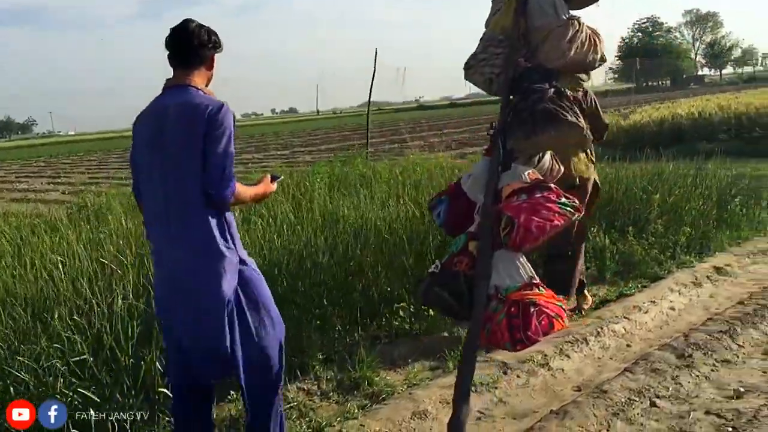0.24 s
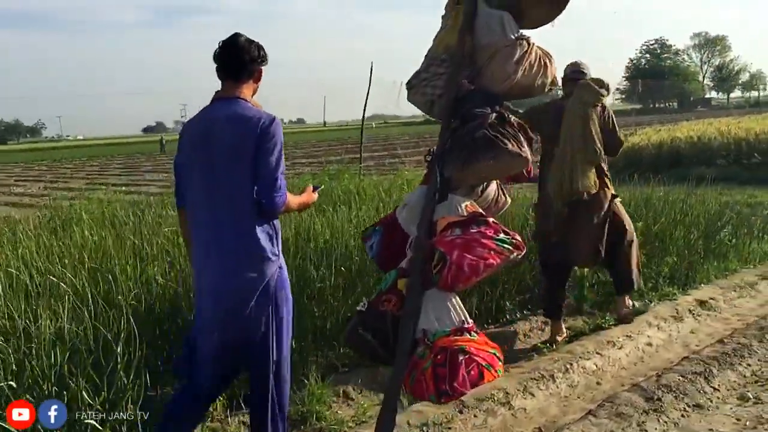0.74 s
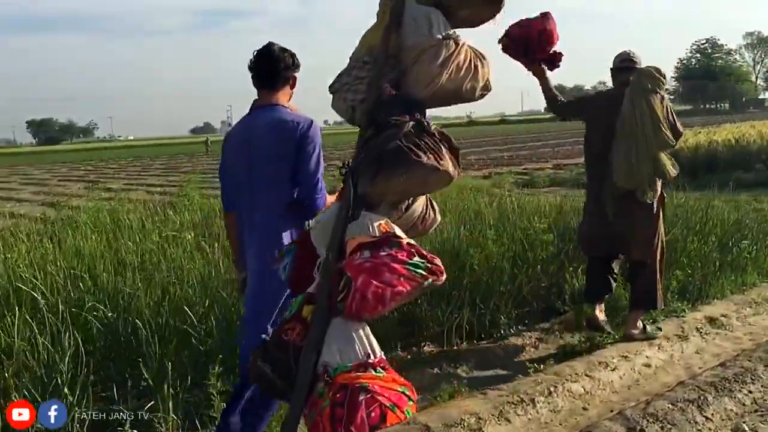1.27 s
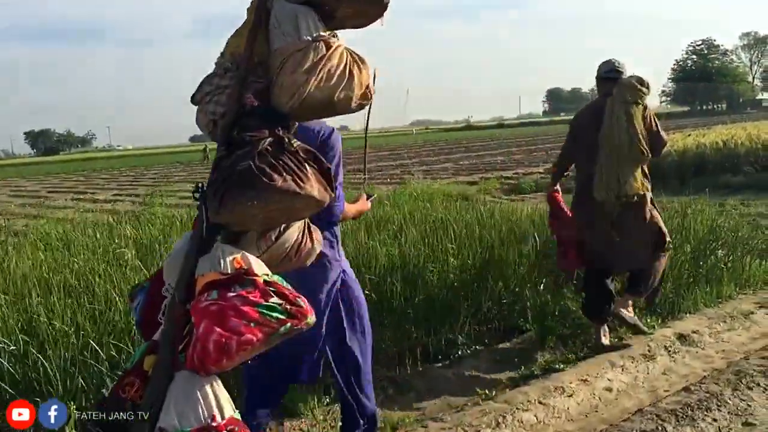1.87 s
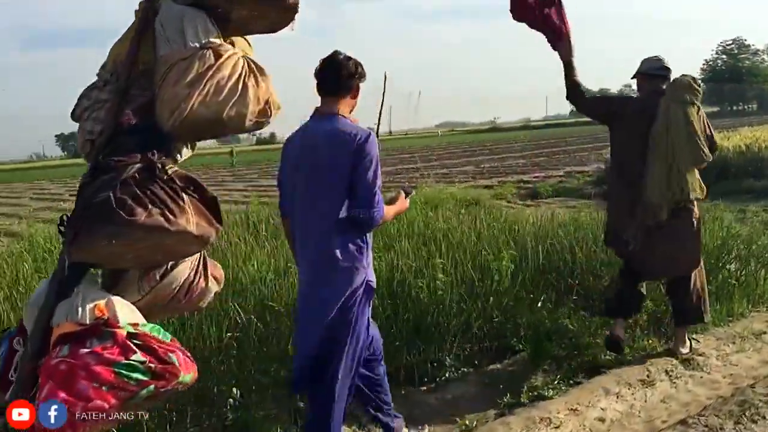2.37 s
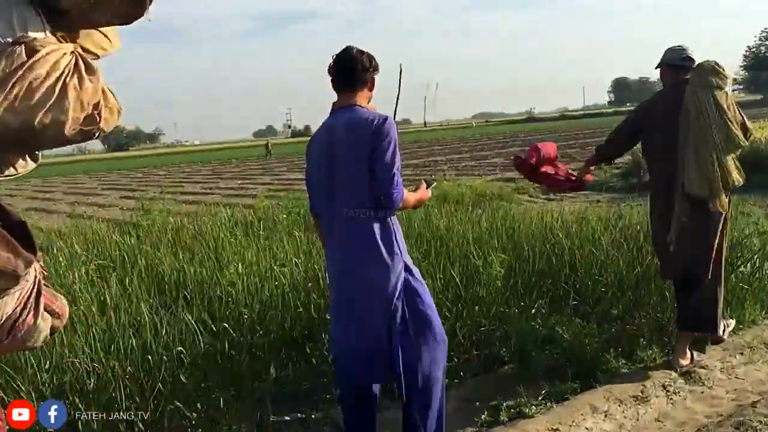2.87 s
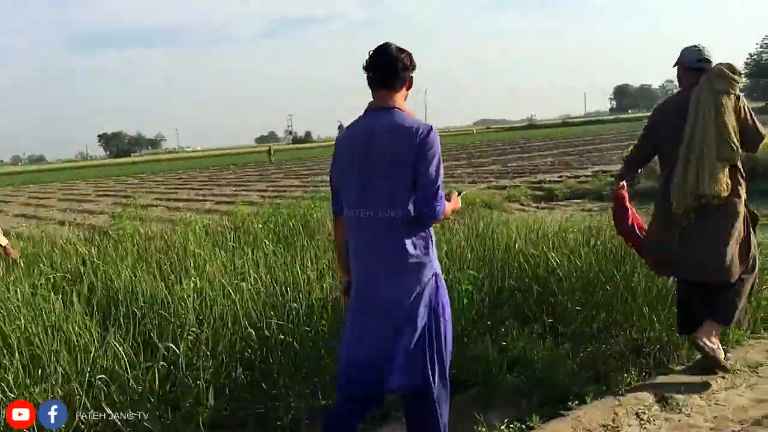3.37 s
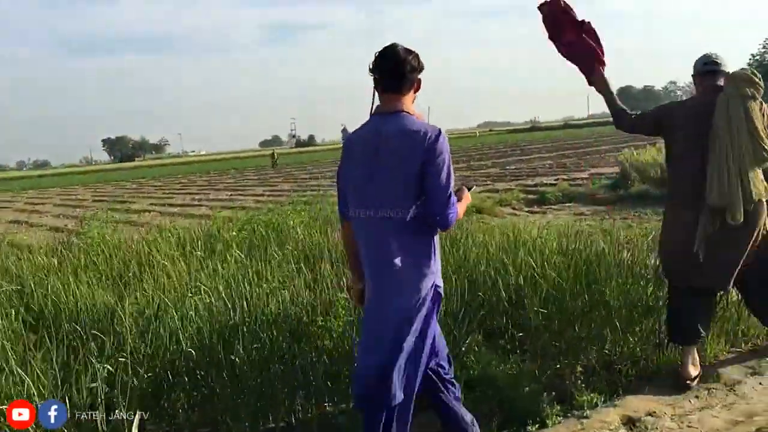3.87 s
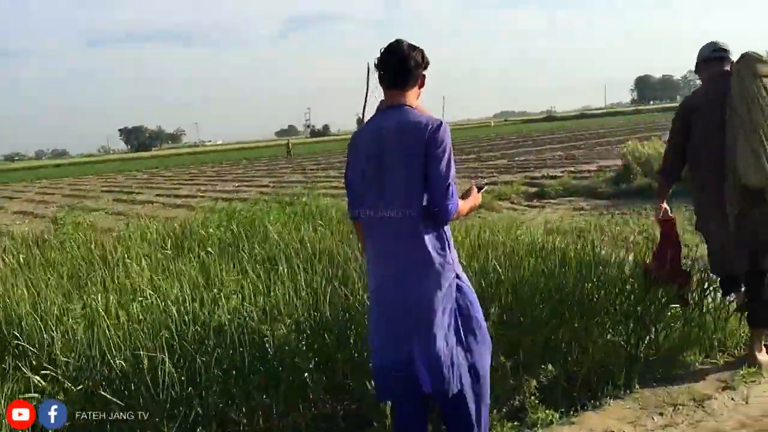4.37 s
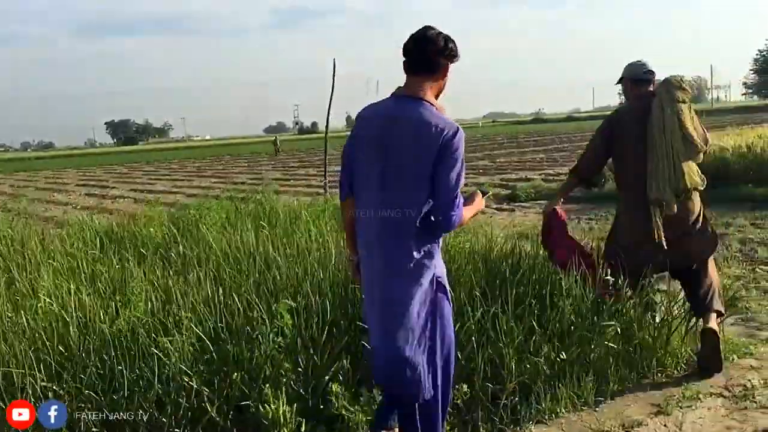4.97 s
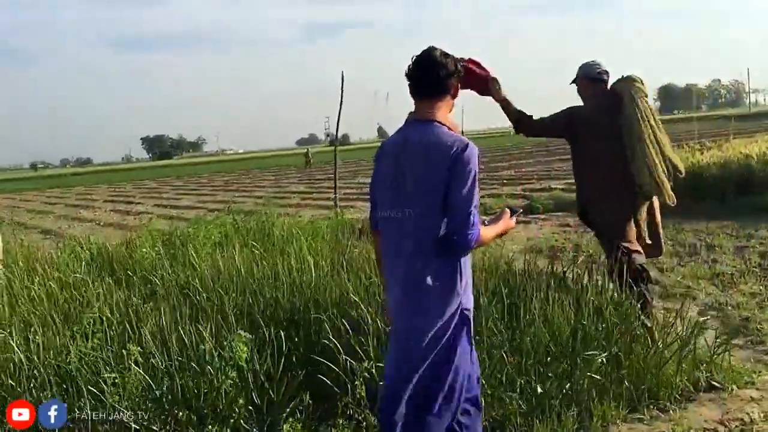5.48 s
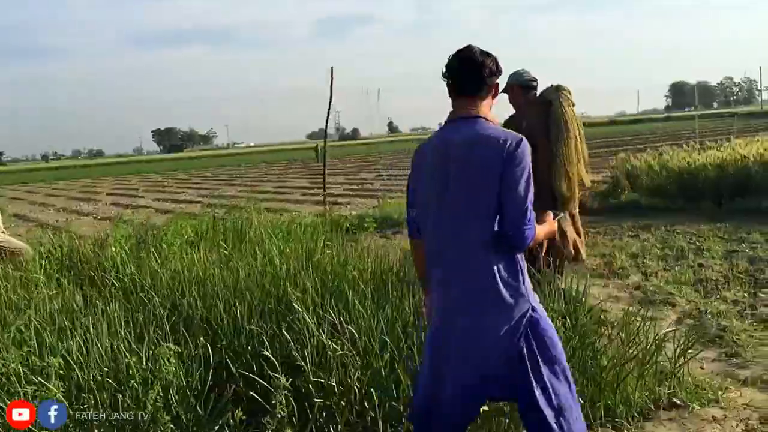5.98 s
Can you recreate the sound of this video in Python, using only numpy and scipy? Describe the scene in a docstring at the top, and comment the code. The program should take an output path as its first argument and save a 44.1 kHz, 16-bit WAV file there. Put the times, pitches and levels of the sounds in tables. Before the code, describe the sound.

A sparse opening of quail whips, stray pips and walking noise in an open field gives way to regular, bright bird-call phrases: a fast rising trill, then a closing triplet. Quail keep answering with upward flicks and quiet hoarse growls, while far caws and thin whistles grow busier. Stalks crackle, feet scuff and low wind buffets ring the handheld microphone.

```python
"""Open crop field in the morning. A hand-worked bird call pips in trills and triplets of short sagging whistles.
Caged quail answer with rising whip notes (swept sines) and throbbing growls (harmonics with breath noise).
Farther birds whistle in gliding sines and caw in pulsed partials. People walk through the crop in grainy
noise, with knocks and crackling stalks; wind rumbles and rings the microphone port over a far hush."""
import sys
import numpy as np
from scipy import signal
from scipy.io import wavfile

SR = 44100
rng = np.random.default_rng(int(sys.argv[2]) if len(sys.argv) > 2 else 0)


def generate_wav(signal):
    """Clip the signal to [-1, 1] and save it as 16-bit WAV at the path in sys.argv[1]."""
    frames = np.transpose(np.atleast_2d(signal))
    scaled = np.clip(frames, -1, 1) * 32767
    pcm = np.round(scaled).astype(np.int16)
    wavfile.write(sys.argv[1], SR, pcm)


N = 274743

# Other pips, single or beside the trills and triplets; the first is the tail of a whip.
# Each row: time in seconds, level in dB, pitch in Hz.
OTHER_PIPS = [(0.004, -51, 2154), (0.236, -43, 2180), (.246, -58, 2160), (1.4437, -56.5, 2510),
              (2.1527, -36.5, 2540), (2.251, -39.5, 2377), (2.2952, -50.5, 2470), (2.8394, -47, 2430),
              (2.9174, -42.5, 2490), (3.8586, -45, 2450), (4.8488, -41, 2410), (5.1383, -47.5, 2410),
              (5.5425, -47, 2440), (5.724, -42, 2454), (5.734, -39.5, 2435), (5.8667, -38.5, 2506),
              (5.879, -42.5, 2570)]
# Rising trills that open each phrase. Each row: first pip in seconds, last pip in seconds, first level in dB,
# last level in dB, swell in the middle in dB, first pitch in Hz, last pitch in Hz.
TRILLS = [(2.7353, 2.778, -40.5, -45, 9, 2423, 2466), (3.305, 3.35, -41, -33, 5, 2330, 2450),
          (4.015, 4.063, -30, -32, 0, 2365, 2510), (4.621, 4.685, -37.5, -30.5, 2, 2220, 2437),
          (5.253, 5.315, -31.5, -33.5, 0, 2175, 2420), (5.899, 5.959, -34, -32.5, -4.5, 2170, 2330)]
# Triplets that close each phrase. Each row: first pip in seconds, its level in dB, its pitch in Hz,
# middle pip against the first in dB.
TRIPLETS = [(2.8552, -36, 2455, -9), (3.448, -31, 2440, -32), (4.14, -28, 2370, -3),
            (4.785, -30, 2350, -6.5), (5.4174, -27.5, 2352, -10), (6.064, -33.5, 2348, -8)]
# Quail whip notes. Each row: time near the top of the sweep in seconds, top level in dB,
# slow start against the top in dB, start pitch in Hz.
WHIPS = [(0.194, -38, 3, 1638), (0.318, -41, 9.5, 1627), (1.9342, -38, -11.5, 1490),
         (2.1113, -36.5, -5.5, 1406), (2.233, -38.5, -5, 1350), (2.9916, -34.5, -12, 1534),
         (3.292, -38.5, -5.5, 1350), (3.9998, -38, -3.5, 1456), (4.185, -49.5, 5.5, 1505),
         (4.304, -45, 1, 1426), (4.772, -37, -18, 1510), (4.88, -36.5, -19.5, 1400),
         (5.0524, -31, -12.5, 1530), (5.2332, -43.5, 2.5, 1357), (5.3595, -41.5, 0.5, 1440),
         (5.64, -42, -14, 1466), (5.75, -36.5, -21, 1410)]
# Quail growls. Each row: start in seconds, length in seconds, pitch in Hz, level in dB,
# moment one throb opens in seconds, lift of the upper partials in dB.
GROWLS = [(0.692, 0.3, 617.4, -56.5, 0.8665, -5), (2.281, 0.37, 611, -58.5, 2.402, -4),
          (3.79, 0.31, 638.6, -55, 3.928, -7), (5.331, 0.22, 631.5, -53, 5.375, 6.5)]
# Colour of the growling throat. Each row: frequency in Hz, relative level in dB.
GROWL_THROAT = [(290, -50), (500, -10), (1020, -18), (1250, 1.5), (1900, 0.5), (2480, 9.5), (3100, 5.5),
                (4800, -8), (7420, -3.5), (9000, -80), ]
# Far whistles. Each row: start in seconds, length in seconds, first, middle and last pitch in Hz, level in dB.
WHISTLES = [(1.305, .035, 2400, 2480, 2580, -56), (2.05, .032, 2500, 2400, 2550, -53),
            (2.19, .05, 4150, 4100, 3950, -66), (3.153, .03, 1450, 1620, 1700, -46),
            (3.243, .035, 1600, 1560, 1500, -58), (3.505, .05, 3000, 3100, 3500, -52),
            (4.582, .068, 3350, 3050, 3350, -53), (4.815, .055, 2950, 3100, 3550, -49),
            (5.62, .022, 1500, 1650, 1750, -46), (5.868, .07, 3350, 3050, 3450, -52),
            (6.092, .055, 3000, 3100, 3400, -50)]
# Far hoarse caws. Each row: start in seconds, length in seconds, throat pitch in Hz, level in dB.
CAWS = [(0.797, 0.31, 1415, -61), (1.384, 0.19, 1370, -60.5), (3.941, 0.24, 1456, -57),
        (4.258, 0.12, 1490, -60), (4.429, 0.21, 1375, -57.5), (4.524, 0.15, 1703, -57),
        (4.743, 0.18, 1463, -65), (5.109, 0.16, 1650, -58.5), (5.239, 0.28, 1340, -53.5),
        (5.369, 0.204, 1700, -58.5), (5.597, 0.21, 1690, -55), (5.704, 0.13, 1403, -66.5),
        (5.825, 0.12, 1690, -67), (6.184, 0.084, 1371, -52)]
# Feet scuffing the soil. Each row: start in seconds, length in seconds, level in dB.
SCUFFS = [(.2, 0.4, -55.5), (.72, 0.26, -58.5), (1.19, 0.14, -59), (1.45, 0.16, -61), (1.75, 0.3, -58.5),
          (2.28, 0.34, -59.5), (2.58, 0.19, -55), (3.1, 0.37, -61.5), (4.07, 0.098, -50), (4.55, 0.54, -64),
          (5.28, 0.22, -56), (5.54, 0.085, -54.5), (6.12, 0.36, -54)]
# Colour of the scuffs. Each row: frequency in Hz, relative level in dB per Hz.
SCUFF_COLOUR = [(150, 2), (400, -3), (900, -0.5), (1300, -17), (3000, -25)]
# Legs swishing through the leaves. Each row: start in seconds, length in seconds, level in dB.
SWISHES = [(.35, 0.33, -61), (.8, 0.36, -62), (1.36, 0.062, -67), (2.24, 0.37, -59.5), (3.19, 0.45, -59),
           (4.06, 0.28, -64), (4.54, 0.24, -57.5), (5.1, 0.59, -56.5), (6.08, 0.14, -52)]
# Colour of the leaves. Each row: frequency in Hz, relative level in dB per Hz.
LEAF_COLOUR = [(1000, 6), (2500, 8.5), (6000, 1.5), (10500, -1.5), (15000, -0.5)]
# Knocks and one thin tick. Each row: time in seconds, strike level in dB, pitch in Hz.
KNOCKS = [(1.198, -38, 497), (1.207, -40, 830), (1.2262, -29.5, 610), (1.357, -47, 587), (1.846, -35, 265),
          (2.393, -37.5, 1270), (2.793, -40.5, 1550), (2.9285, -41, 16000), (3.539, -44.5, 750),
          (4.078, -33.5, 870), (4.582, -38.5, 955), (5.553, -34.5, 960), (5.672, -39, 810)]
# Crackling stalks. Each row: time just before the peak in seconds, level in dB, decay time in seconds,
# lowest pitch in Hz.
SNAPS = [(1.751, -58.5, 0.013, 3000), (1.84, -42.5, 0.017, 1220), (1.9648, -46, 0.02, 4950),
         (2.044, -57, 0.018, 6960), (3.223, -51.5, .02, 2970), (3.272, -51.5, 0.021, 6000),
         (4.446, -61.5, 0.036, 10300), (4.571, -48, 0.036, 2970), (4.815, -46.5, 0.0049, 3970),
         (4.877, -49.5, 0.0093, 5960), (5.602, -48, 0.0085, 3030), (6.108, -45.5, 0.011, 2020),
         (6.211, -47.5, 0.012, 6000)]
# Wind slaps. Each row: time just before the slap in seconds, strike level in dB, puff against the slap in dB.
BUFFETS = [(0.28, -33, -10), (1.225, -40, 1), (1.511, -38.5, -0.5), (1.943, -33.5, -26), (2.197, -40, -7),
           (2.372, -30.5, 1.5), (2.631, -30, -1.5), (2.931, -34, 0), (3.049, -24.5, -5), (3.227, -32.5, 6),
           (3.643, -26, -2), (3.775, -25.5, -9), (3.957, -38, 8.5), (4.036, -29, -20), (4.337, -40.5, 9.5),
           (4.472, -32, 6), (4.613, -24, -3), (4.78, -31, -15), (5.055, -21, -4), (5.168, -31.5, 0.5),
           (5.333, -26.5, 1), (5.743, -34.5, 9.5), (5.87, -31, 19)]
# Turbulence between the slaps. Each row: time in seconds, level in dB.
WIND_LEVEL = [(0.0, -41.5), (0.17, -63), (0.6, -63.5), (0.9, -52), (1.25, -53.5), (1.6, -56.5), (2.44, -44),
              (2.88, -48), (3.12, -41.5), (3.5, -55), (3.9, -43), (4.34, -51.5), (4.53, -40), (4.93, -51),
              (5.26, -48.5), (5.79, -39.5), (5.95, -49.5), (6.23, -41)]
# Colour of the turbulence. Each row: frequency in Hz, relative level in dB per Hz.
WIND_COLOUR = [(15, -42), (25, -9), (48, -2), (70, 3), (146, -14.5), (400, -35.5), (520, -92)]
# Colour of the far hush. Each row: frequency in Hz, relative level in dB per Hz.
AIR_COLOUR = [(88, -59), (150, -4.5), (466, -11), (2180, -13.5), (2500, -16.5), (4860, -22), (15100, -27),
              (16000, -37)]

PIP_GAP_S = 0.021   # approximate spacing of the squeezes in a trill
MIDDLE_S, MIDDLE_DROP_HZ = 0.015, 90.5   # the middle pip of a triplet is lower
LAST_S, LAST_RISE_HZ, LAST_DB = 0.046, 54.4, -2   # the last one is a little higher and softer
CAW_PULSES_PER_S = 81   # before the arch and waver of each caw
GROUND_ECHO_S, GROUND_ECHO_DB = 0.003123, -8
AIR_DB = -64.5
CUTOFF_HZ = 15900


def pips():
    """Spell out trills and triplets pip by pip, with the other pips: rows of s, dB, Hz."""
    rows = list(OTHER_PIPS)
    for first_s, last_s, first_db, last_db, swell_db, first_hz, last_hz in TRILLS:
        count = round((last_s - first_s) / PIP_GAP_S) + 1
        for u in np.linspace(0, 1, count):
            s = first_s + u * (last_s - first_s)
            db = first_db + u * (last_db - first_db) + swell_db * np.sin(np.pi * u)
            rows.append((s, db, first_hz + u * (last_hz - first_hz)))
    for s, db, hz, middle_db in TRIPLETS:
        rows.append((s, db, hz))
        rows.append((s + MIDDLE_S, db + middle_db, hz - MIDDLE_DROP_HZ))
        rows.append((s + LAST_S, db + LAST_DB, hz + LAST_RISE_HZ))
    return rows


def bird_call(nominal_s=0.014, lead_s=0.003, sag=0.044, wobble=0.016, rough_db=1.77,
              side_max_db=-17, side_ratio=0.95, linger_db=-6.0, flutter_per_s=55):
    """Squeezes blow short sagging whistles with a faint lower side note; leftover air flutters on."""
    out = np.zeros(N)
    for s, db, hz in pips():
        stretch, skew, side, start = rng.random(4)
        u = np.linspace(0, 1, round(nominal_s * (0.84 + 0.18 * stretch) * SR))
        puff = np.sin(np.pi * u ** (0.67 + 0.4 * skew)) ** 2.1
        pitch = hz * (1 + sag * (0.5 - u) + wobble * drift(160, size=len(u)))
        phase = 2 * np.pi * (np.cumsum(pitch) / SR + start)
        side_note = from_db(side_max_db + 4.1 * (side - 1.0)) * np.sin(side_ratio * phase)
        level = from_db(db + rough_db * drift(200, size=len(u)))
        add(out, s - lead_s, level * puff * (np.sin(phase) + side_note))
    hiss = rng.standard_normal(N)
    for _ in range(2):
        hiss = ring(hiss, hz=2393, t60=0.011)
    keep = np.exp(-1 / (0.022 * SR))   # air pressure leaks away over 22 ms
    pressure = signal.lfilter([1 - keep], [1, -keep], np.abs(out))
    flutter = 1 + 0.43 * np.sin(2 * np.pi * flutter_per_s * np.arange(N) / SR)
    return out + from_db(linger_db) * pressure * flutter * rms_one(hiss)


def whips(length_s=0.024, top_hz=3400, shelf_hz=2220, bend=9, past_s=0.0027):
    """A sine of slightly unsteady level climbs to a shelf, then flicks up and stops."""
    out, u = np.zeros(N), np.linspace(0, 1, round(length_s * SR))
    rise = u * np.minimum((1 - u) / 0.06, 1)
    for s, db, start_db, start_hz in WHIPS:
        hz = start_hz + (shelf_hz - start_hz) * u ** 0.814 + (top_hz - shelf_hz) * u ** bend
        slow_start = np.clip((2800 - hz) / 400, 0, 1)   # fades out from 2400 to 2800 Hz
        level_db = db + start_db * slow_start + 2.0 * drift(230, size=len(u))
        tone = np.sin(2 * np.pi * np.cumsum(hz) / SR)
        add(out, s + past_s - length_s, rise * from_db(level_db) * tone)
    return out


def growls(breath_db=-11, throbs_per_s=37, scoop=0.5, settle=0.13, jitter=0.02, rough=0.09,
           shut=0.05, smear=0.05):
    """A hoarse harmonic voice is chopped into upward-scooping throbs; breath hisses through its throat."""
    out = np.zeros(N)
    for s, length_s, hz, db, opens_s, upper_db in GROWLS:
        t, swell = over_span(length_s, sharp=1.0)
        size = len(t)
        throb = ((t + s - opens_s) * throbs_per_s + 0.06 * drift(10, size)) % 1   # place within a throb
        pitch = hz * (1 - scoop * np.exp(-throb / settle) + jitter * drift(42.0, size))
        phase, voice = 2 * np.pi * np.cumsum(pitch) / SR, 0
        for k in range(1, 13):
            # higher partials come later, fray into rasp and are chopped less
            gate = np.sin(np.pi * throb ** (0.16 + 0.029 * k)) ** 2
            chop = (shut + smear * k + gate) / (1 + smear * k)
            settled = (pitch / hz) ** k
            level_db = at_hz(GROWL_THROAT, k * pitch) + upper_db * (k > 4) + 3.8 * drift(27, size)
            rasp = (1 + rough * k * drift(270, size)) / np.hypot(1, rough * k)
            tone = np.sin(k * phase + rng.uniform(0, 2 * np.pi))
            voice = voice + from_db(level_db) * rasp * tone * chop * settled
        breath = 0
        for band_hz in np.arange(1.5, 12) * hz:
            band_db = at_hz(GROWL_THROAT, band_hz) + upper_db * (band_hz > 3000)
            breath = breath + from_db(band_db) * rms_one(ring(rng.standard_normal(size), band_hz, t60=0.0017))
        breath = breath * (0.4 + np.sin(np.pi * throb ** 0.6) ** 2)
        voice = rms_one(voice) + from_db(breath_db) * rms_one(breath)
        add(out, s, swell * from_db(db + 2.5 * drift(9.8, size)) * rms_one(voice))
    return out


def whistles():
    """Gliding sines waver with distance; the pitch follows a parabola through three points."""
    out = np.zeros(N)
    for s, length_s, *hz, db in WHISTLES:
        t, swell = over_span(length_s, sharp=0.8)
        glide = np.polyval(np.polyfit([0, length_s / 2, length_s], hz, 2), t)
        pitch = glide * (1 + 0.018 * drift(88, size=len(t)))
        level = from_db(db + 2.5 * drift(90, size=len(t)))
        add(out, s, swell * level * np.sin(2 * np.pi * np.cumsum(pitch) / SR))
    return out


def caws(arch=0.039, width_hz=60.0, breath=0.75, waver=0.009):
    """Throat pulses arch up in rate and sag; only partials near the throat pitch carry this far."""
    out = np.zeros(N)
    for s, length_s, hz, db in CAWS:
        t, swell = over_span(length_s, sharp=0.28)
        bow = 1 + arch * (np.sin(np.pi * (t / length_s) ** 0.686) - 0.7)
        rate = CAW_PULSES_PER_S * (bow + waver * drift(13.6, size=len(t)))
        beat = 2 * np.pi * np.cumsum(rate) / SR
        centre, voice = round(hz / CAW_PULSES_PER_S), 0
        for k in range(-3, 4):
            carry = np.exp(-0.5 * (k * CAW_PULSES_PER_S / width_hz) ** 2)
            flicker = from_db(4.3 * drift(16, size=len(t)))
            voice = voice + carry * flicker * np.sin((centre + k) * beat + rng.uniform(0, 2.55))
        air = ring(ring(rng.standard_normal(len(t)), hz, t60=0.011), hz, t60=0.011)
        level = from_db(db + 1.47 * drift(17, size=len(t)))
        add(out, s, swell * level * rms_one(rms_one(voice) + breath * rms_one(air)))
    return out


def walkers(grains_per_s=700):
    """Feet scuff the soil and legs brush the leaves: coloured noise with dense random grains."""
    sizes = from_db(4.5 * np.minimum(rng.exponential(1, N), 4))
    grain = 1 + 1.8 * sizes * (rng.random(N) < grains_per_s / SR)
    soil = coloured(SCUFF_COLOUR, patchy_db=3.5, rate=25, alone=0.7, grain=grain)
    leaves = coloured(LEAF_COLOUR, patchy_db=1.8, rate=30, alone=1.5, grain=grain)
    return swells(SCUFFS, sharp=0.8) * soil + swells(SWISHES, sharp=0.7) * leaves


def knocks():
    """A blow followed by grit passes a broad band filter and sets one short resonance ringing."""
    out, t = np.zeros(N), np.arange(round(SR / 10)) / SR
    for s, db, hz in KNOCKS:
        scrape = 0.058 * np.exp(-t / 0.012) * rng.standard_normal(len(t))
        scrape[0] = 1   # the blow itself, then grit
        edges = [hz / 2.5, min(2.2 * hz, 20000)]
        strike = 2.5 * signal.sosfilt(signal.butter(2, edges, "band", fs=SR, output="sos"), scrape)
        add(out, s, from_db(db) * ring(strike, hz, t60=2.2 / hz))
    return out


def snaps(bend=0.27):
    """Stalks bend, crack and splinter: rough noise rings in five pitches, each flickering alone."""
    out = np.zeros(N)
    for s, db, length_s, low_hz in SNAPS:
        t = np.arange(round(3 * length_s * SR)) / SR
        fade_s = np.where(t < length_s, bend * length_s, length_s)   # quick rise, slower decay
        shape = np.exp(-np.abs(t - length_s) / fade_s)
        grit = rng.standard_normal(len(t)) * from_db(1.4 * drift(390, size=len(t)))
        splinter = 0
        for hz in np.geomspace(low_hz, 14500, 5) * rng.uniform(0.9, 1.05, 5):
            flicker = from_db(12.4 * drift(76, size=len(t)))
            splinter = splinter + ring(grit, hz, t60=6 / hz) * hz * flicker
        add(out, s - length_s * (1 - bend), from_db(db) * shape * rms_one(splinter))
    return out


def wind(port_hz=64, t60=0.11, late_s=0.0135):
    """Lumpy turbulence, and slaps that ring the microphone port with a brighter puff at the front."""
    slaps, puffs = np.zeros(N), np.zeros(N)
    for s, db, puff_db in BUFFETS:
        add(slaps, s + late_s, from_db([db]))
        add(puffs, s + late_s, from_db([db + puff_db]))
    rung = ring(slaps, port_hz, t60) - ring(puffs, hz=146.0, t60=0.026)
    rung = signal.sosfilt(signal.butter(2, 240, fs=SR, output="sos"), rung)
    level_db = np.interp(np.arange(N) / SR, *np.transpose(WIND_LEVEL))
    return from_db(level_db) * coloured(WIND_COLOUR, patchy_db=4.3, rate=13.3, alone=0.8) + rung


def far_hush():
    """Gently flickering bands of noise lie under everything."""
    return from_db(AIR_DB) * coloured(AIR_COLOUR, patchy_db=0.8, rate=6, alone=0.8)


def open_field(x, t60=0.26, tail_db=-3.5, ground_db=GROUND_ECHO_DB):
    """Add a ground echo and a diffuse tail scattered by the crop, which keeps the middle range."""
    out, t = x.copy(), np.arange(round(0.4 * SR)) / SR
    add(out, GROUND_ECHO_S, from_db(ground_db) * x)
    decay = from_db(-60 * t / t60) + 7.8 * np.exp(-t / 0.0075)   # long tail plus a dense early burst
    scatter = ring(rng.standard_normal(len(t)), hz=2230, t60=0.0013) * decay
    tail = signal.fftconvolve(x, rms_one(scatter) / np.sqrt(len(t)))[:N]
    return out + from_db(tail_db) * tail


def coloured(spectrum, patchy_db, rate, alone, grain=1):
    """Half-octave bands of noise flicker together and partly alone; the mix has rms 1."""
    out, together, edges = 0, drift(rate), 22 * 2 ** np.arange(0, 9.6, 0.5)
    white = grain * rng.standard_normal((2, N))   # neighbouring bands get unrelated noise
    for k, (low, high) in enumerate(zip(edges, edges[1:])):
        band = signal.sosfilt(signal.butter(2, [low, high], "band", fs=SR, output="sos"), white[k % 2])
        flicker_db = patchy_db * (together + alone * drift(rate))
        out = out + band * from_db(at_hz(spectrum, np.sqrt(low * high)) + flicker_db)
    return rms_one(out)


def ring(x, hz, t60):
    """A two-pole resonance: a unit click starts a sine of height about 1, down 60 dB after t60 seconds."""
    r, w = from_db(-60 / (t60 * SR)), 2 * np.pi * hz / SR
    return signal.lfilter([0, np.sin(w)], [1, -2 * r * np.cos(w), r * r], x + 1e-18)


def drift(rate, size=N):
    """Smooth random wander of spread about 1: noise low-passed near rate in Hz, at every 40th sample."""
    r = np.exp(-80 * np.pi * rate / SR)
    slow = signal.lfilter([1], [1, -2 * r, r * r], rng.standard_normal(size // 40 + 2002))
    settled = rms_one(slow)[2000:]
    return np.interp(np.arange(size) / 40, np.arange(len(settled)), settled)


def swells(rows, sharp):
    """Gain over time from rows of start, length and level."""
    out = np.zeros(N)
    for s, length_s, db in rows:
        add(out, s, from_db(db) * over_span(length_s, sharp)[1])
    return out


def over_span(length_s, sharp):
    """Local time and an arch-shaped swell for one sound."""
    t = np.arange(round(length_s * SR)) / SR
    return t, np.sin(np.pi * t / length_s) ** sharp


def at_hz(points, hz):
    """Read a colour curve in dB along log frequency."""
    curve_hz, curve_db = np.array(points).T
    return np.interp(np.log(hz), np.log(curve_hz), curve_db)


def add(out, s, sound):
    """Mix a sound in from second s."""
    at = max(round(s * SR), 0)
    out[at:at + len(sound)] += sound[:N - at]


def from_db(db):
    """Turn decibels into an amplitude factor."""
    return 10 ** (np.asarray(db) / 20)


def rms_one(x):
    """Scale a signal to rms 1."""
    return x / np.sqrt(np.mean(x ** 2) + 1e-20)


def scene():
    """Mix the birds in the open field, the walkers, the wind and the far hush."""
    out = open_field(bird_call(), tail_db=-13, ground_db=-30)
    out += open_field(whips())
    out += open_field(growls(), tail_db=-5.0, ground_db=-1.5)
    out += whistles() + caws()
    out += walkers() + knocks() + snaps()
    out += wind() + far_hush()
    return out[None]


def record(dry):
    """The microphone drops the deepest bass and has a narrow dip in the treble; the top is cut."""
    x = signal.sosfilt(signal.butter(4, 38, "high", fs=SR, output="sos"), dry)
    x = 0.18 * x + signal.lfilter(*signal.iirnotch(10400, 25, fs=SR), x)   # the dip is partly filled
    return signal.sosfilt(signal.ellip(10, 0.5, 45, CUTOFF_HZ, fs=SR, output="sos"), x)


dry = scene()
out = record(dry)
generate_wav(out)
```